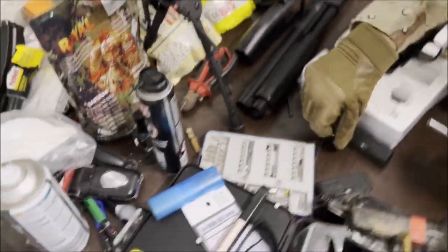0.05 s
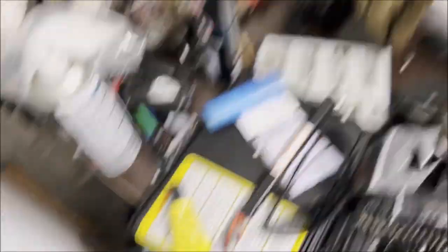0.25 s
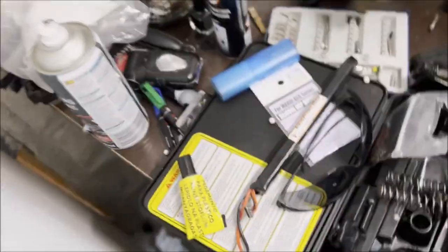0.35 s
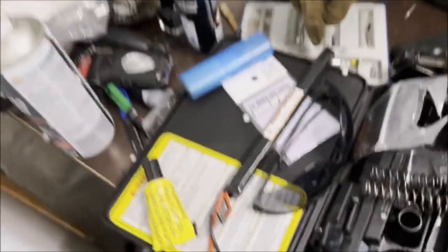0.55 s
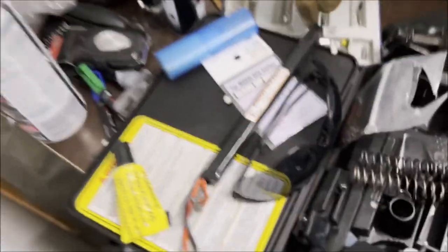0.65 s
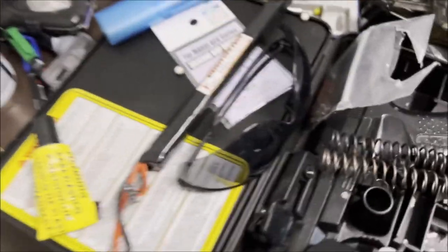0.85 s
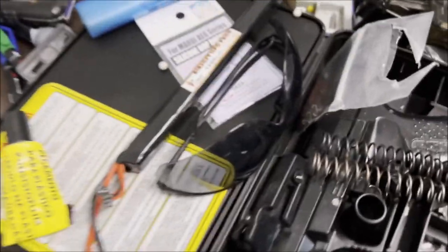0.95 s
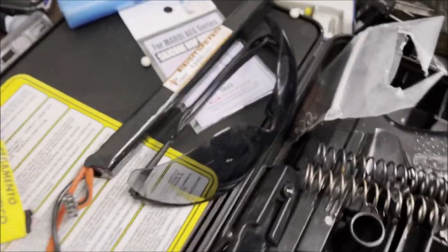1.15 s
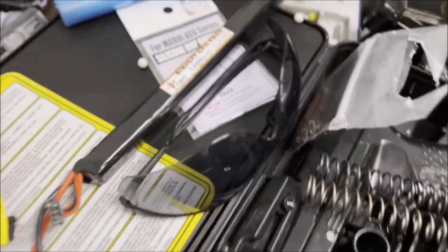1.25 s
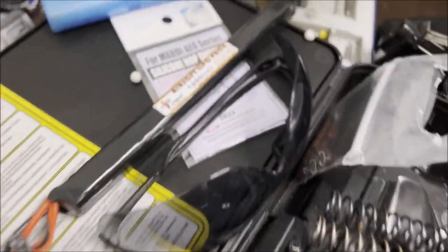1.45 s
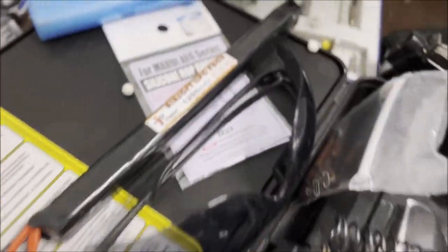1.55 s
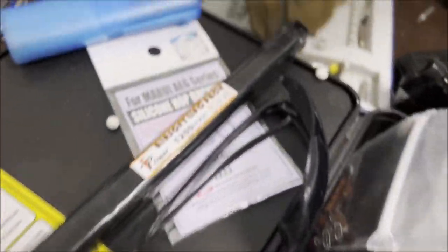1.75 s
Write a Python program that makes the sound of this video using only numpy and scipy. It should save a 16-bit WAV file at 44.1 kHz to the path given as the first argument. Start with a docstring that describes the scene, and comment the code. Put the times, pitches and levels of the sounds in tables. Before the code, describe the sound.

A plastic tray scrapes across a workbench and small metal parts clatter in it.

```python
"""A plastic tray scrapes and squeaks over a cluttered workbench, and small metal parts clatter in it.
They settle, a hard piece clacks down, something knocks the bench top and a few light ticks follow.
Heard from a stereo pair of microphones about an arm's length away, in a small room: the clutter and
the walls scatter the hits, with soft handling noises and a faint rumble and hum underneath."""
import sys
import numpy as np
from scipy import signal
from scipy.fft import rfft, irfft
from scipy.io import wavfile
from scipy.ndimage import uniform_filter1d

SR = 44100
rng = np.random.default_rng(int(sys.argv[2]) if len(sys.argv) > 2 else 0)


def digitize_waveform(pressure):
    """Quantize a signal to 16-bit integers and store it at the path in sys.argv[1].

    Rows of a 2-D input are taken as channels; values are limited to [-1, 1].
    """
    field = np.atleast_2d(pressure).T
    bounded = np.clip(field, -1, 1)
    quanta = np.round(bounded * 32767).astype(np.int16)
    wavfile.write(sys.argv[1], SR, quanta)


N = 79380
TIME_S, FREQ_HZ = np.arange(N) / SR, np.fft.rfftfreq(N, 1 / SR)


def undb(db):
    """Decibels to gain."""
    return 10 ** (np.asarray(db) / 20)


def unit(x):
    """Scale to unit energy."""
    return x / np.sqrt(np.sum(x ** 2, axis=-1, keepdims=True) + 1e-18)


def convolve(x, response):
    """Play sound through a response, channel by channel."""
    return irfft(rfft(x, 2 * N) * rfft(response, 2 * N))[..., :N]


def on_log_axis(points, hz):
    """Read (frequency [Hz], value) points at any frequency."""
    point_hz, value = np.array(points).T
    return np.interp(np.log(hz + 1), np.log(point_hz), value)


def colour(points):
    """Causal unit-energy response with the given spectrum."""
    size = 2048
    gain = undb(on_log_axis(points, np.fft.rfftfreq(size, 1 / SR)))
    cepstrum = irfft(np.log(gain))
    cepstrum[1:size // 2] *= 2  # fold to minimum phase
    cepstrum[size // 2:] = 0
    response = irfft(np.exp(rfft(cepstrum)))
    return np.pad(unit(response), (0, N - size))


def decay(t60):
    """Envelope that falls 60 dB in t60 seconds."""
    return np.exp(-np.log(1000) * TIME_S / t60)


def ring(modes):
    """Unit-energy response of damped modes; a mode's level sets its share of the energy."""
    response = np.zeros(N)
    for hz, db, t60 in modes:
        mode = unit(np.sin(2 * np.pi * hz * TIME_S) * decay(t60))
        response += rng.choice([-1, 1]) * undb(db) * mode
    return unit(response)


def two_mics(x, left_lag_ms):
    """The direct sound reaches the left microphone late by the lag, or early if it is negative."""
    delay_s = np.maximum(np.array([[left_lag_ms], [-left_lag_ms]]), 0) / 1000
    hz = np.fft.rfftfreq(len(x), 1 / SR)
    return irfft(rfft(x) * np.exp(-2j * np.pi * hz * delay_s), len(x))


def grit(count, spread_db):
    """Dense tiny contacts of very unequal size, rms 1."""
    signs = rng.choice([-1, 1], count)
    sizes = undb(spread_db * np.clip(rng.standard_normal(count), -2, 2))
    return unit(signs * sizes) * np.sqrt(count)


def friction(spread_db, left_lag_ms, clutter_db):
    """Steady stick-slip grit at the microphones, part direct and part scattered, rms 1."""
    scattered = np.array([grit(N, spread_db) for _ in range(2)])
    direct = two_mics(grit(N, spread_db), left_lag_ms)
    return unit(direct + undb(clutter_db) * scattered) * np.sqrt(N)


def swells(table):
    """Envelope of pushes that swell and fade."""
    return sum(undb(db) * np.clip(1 - (2 * (TIME_S - start) / length - 1) ** 2, 0, 1) ** 0.48
               for start, length, db in table)


def strikes(table, chatter_s, spread_db, left_lag_ms, clutter_db, clutter_s):
    """Each hit is a brief flurry of contacts with its own hardness and its own echoes off the clutter."""
    size, treble_corner_hz, bass_corner_hz = 4096, 5160, 920
    t, hz = np.arange(size) / SR, np.fft.rfftfreq(size, 1 / SR)
    treble_shelf = hz ** 4 / (hz ** 4 + treble_corner_hz ** 4)
    bass_shelf = 1 / (1 + (hz / bass_corner_hz) ** 4)
    echo_envelope = (1 - np.exp(-t / chatter_s)) * np.exp(-t / clutter_s)
    hits = np.zeros((2, N + size))
    for start, db, treble_db, bass_db in table:
        flurry = unit(grit(size, spread_db) * t * np.exp(-t / chatter_s))
        echoes = unit(rng.standard_normal((2, size)) * echo_envelope)
        hit = two_mics(flurry, left_lag_ms) + undb(clutter_db) * echoes
        gain = undb(db + treble_db * treble_shelf + bass_db * bass_shelf)
        i = int(start * SR)
        hits[:, i:i + size] += irfft(rfft(hit) * gain)
    return hits[:, :N]


# decay of the small room (frequency [Hz], t60 [s])
ROOM_T60 = [(100, .45), (600, .38), (2500, .3), (7000, .26), (15000, .18)]


def in_room(x, pan_db, room_db):
    """Add the room's tail, whose treble dies first, and lean the sound to the left microphone."""
    centres_hz = np.geomspace(100, 16000, 8)
    noise, tail = rfft(rng.standard_normal((2, N))), 0
    for centre, share in zip(centres_hz, np.eye(len(centres_hz))):
        band = irfft(noise * on_log_axis(list(zip(centres_hz, share)), FREQ_HZ), N)
        tail = tail + band * decay(on_log_axis(ROOM_T60, centre))
    build_up = 1 - np.exp(-TIME_S / 0.0027)
    reverb = convolve(x, unit(tail * build_up))
    return (x + undb(room_db) * reverb) * undb(np.array([[pan_db], [-pan_db]]) / 2)


# spectrum of the room tone (frequency [Hz], level [dB])
ROOM_TONE_COLOUR = [(20, -17.5), (35, -18.5), (50, 5.5), (70, -2.5), (120, -8.5), (175, -6.5), (280, -15),
                    (550, -17), (1000, -30.5), (2400, -34), (5000, -42), (8000, -41.5), (10000, -47),
                    (15500, -48.5)]


def room_tone():
    """Low rumble with a faint mains hum; the bass is largely shared by both microphones."""
    rumble_db, hum_db, hum_hz = -65, -74.5, 49.05
    mid, side = rfft(rng.standard_normal((2, N))) * undb(on_log_axis(ROOM_TONE_COLOUR, FREQ_HZ))
    width = on_log_axis([(50, 0.27), (300, .4), (2000, 0.54)], FREQ_HZ)
    left_right = mid + np.array([[1], [-1]]) * width * side
    rumble = unit(irfft(left_right, N)) * np.sqrt(N)
    hum = np.sqrt(2) * np.sin(2 * np.pi * hum_hz * TIME_S)
    return undb(rumble_db) * rumble + undb(hum_db) * hum


# glove and packaging rustles, and low handling thuds (time [s], length [s], level [dB])
RUSTLES = [(.06, 0.11, -61), (.975, 0.054, -50), (1.19, 0.067, -79), (1.36, 0.076, -71.5),
           (1.44, 0.12, -75.5), (1.745, 0.053, -73.5)]
THUDS = [(.225, 0.048, -54), (.36, 0.226, -63.5), (1.05, 0.072, -60), (1.127, 0.022, -55.5),
         (1.155, 0.059, -60.5)]
# their spectra (frequency [Hz], level [dB])
RUSTLE_COLOUR = [(200, -19.5), (1000, -5.5), (2400, 1.5), (4000, -6), (7500, -8.5), (10000, -21),
                 (15500, -25)]
THUD_COLOUR = [(30, -18), (70, -4), (130, 0), (220, -3.5), (450, -9.5), (900, -28.5), (3000, -56)]


def handling():
    """Soft rustles and low thuds as things are moved about near the microphones."""
    rubbing = swells(RUSTLES) * friction(spread_db=11.5, left_lag_ms=0, clutter_db=6)
    bumping = swells(THUDS) * friction(spread_db=9, left_lag_ms=0, clutter_db=-15.5)
    rustle = convolve(rubbing, colour(RUSTLE_COLOUR))
    thud = convolve(bumping, colour(THUD_COLOUR))
    return in_room(rustle + thud, pan_db=2.5, room_db=-6)


# pushes over the bench (time [s], length [s], level [dB])
SCRAPES = [(-.02, 0.11, -60), (.052, .052, -51.5), (.095, 0.039, -55.5), (0.124, .014, -52.5),
           (0.136, 0.2, -55.5), (.65, 0.21, -66), (.772, 0.067, -57.5), (.85, 0.2, -72.5)]
# spectrum of the sliding (frequency [Hz], level [dB])
SLIDE_COLOUR = [(100, -6), (500, 0.5), (1200, 6.5), (2000, 1.5), (3300, 0), (7000, -9), (10000, -25.5),
                (12000, -22.5), (15500, -42)]
# resonances of the sliding tray (frequency [Hz], level [dB], t60 [s])
SLIDE_MODES = [(557, -2.5, 0.017), (820, 1.5, 0.091), (773, -6, 0.027), (1000, -10.5, 0.034),
               (1167, -12.5, 0.15), (1748, -1.5, .04)]
# squeaks of the tray (time [s], length [s], starting pitch [Hz], level [dB])
SQUEAKS = [(.076, .022, 775, -45), (0.098, 0.05, 802, -56.5), (0.778, 0.051, 758, -57)]


def tray_scrapes():
    """Near the centre, plastic sticks and slips over the bench and catches in rough, rising squeaks."""
    ring_db, rise_hz_per_s, roughness = -5, 1000, .025
    body = unit(colour(SLIDE_COLOUR) + undb(ring_db) * ring(SLIDE_MODES))
    rubbing = swells(SCRAPES) * friction(spread_db=6.5, left_lag_ms=.12, clutter_db=4)
    slide = convolve(rubbing, body)
    waver = unit(uniform_filter1d(rng.standard_normal(N), size=120)) * np.sqrt(N)
    for start, length, pitch_hz, db in SQUEAKS:
        hz = (pitch_hz + rise_hz_per_s * (TIME_S - start)) * (1 + roughness * waver)
        slide += swells([(start, length, db)]) * np.sin(2 * np.pi * np.cumsum(hz) / SR)
    return in_room(slide, pan_db=0.9, room_db=-9)


# dull knocks on the bench (time [s], level [dB])
KNOCKS = [(.0535, -8), (.542, -11), (1.1187, 2.5), (1.122, -8), (1.131, -10), (1.4147, -14.5)]
# ringing of the bench top (frequency [Hz], level [dB], t60 [s])
BENCH_MODES = [(312, -13, 0.13), (502, 0, 0.18), (579, 0, 0.031), (741, 5.5, .04), (831, 1, 0.055),
               (1010, -5, 0.022), (1640, -4, 0.036)]


def bench_knocks():
    """Soft blows ring the bench top, to the left of the microphones."""
    gain_db = -17.5
    blows = np.zeros(N)
    for start, db in KNOCKS:
        blows[int(start * SR)] += undb(gain_db + db)
    bench = convolve(blows, ring(BENCH_MODES))
    return in_room(two_mics(bench, left_lag_ms=-0.2), pan_db=6, room_db=-14.5)


# a hard piece set down, then light ticks
# (time [s], level [dB], treble lift [dB], bass lift [dB], relative ring level [dB], ring centre [Hz])
CLACKS = [(0.9558, -20, 5, -10, -20, 1600), (.9588, -12.5, -8, -13, 2.5, 1550),
          (0.9619, -13, 14.5, -0.5, 2.5, 1700), (1.0139, -25, 12, 9.5, -15, 2000),
          (1.0168, -7, 5, -6, -13.5, 2200), (1.024, -8.5, 3, -6.5, -4, 2600),
          (1.0363, -5.5, 12, -22, -18.5, 2800), (1.0396, -1.5, 0.5, -9, 2.5, 2700),
          (1.0455, -13, 10.5, 6, 7.5, 2700), (1.097, -32.5, -15, 12, -7.5, 1900),
          (1.408, -35.5, 10, 0, -16, 2000), (1.418, -28.5, -4, 9, 2, 1900),
          (1.5057, -21.5, -9, -1, -11.5, 2480)]
# spectrum of its contacts (frequency [Hz], level [dB])
PIECE_COLOUR = [(80, -23.5), (300, -5.5), (600, -1), (1100, -1), (1600, 1.5), (2800, 1), (4500, -6),
                (6000, -15), (8300, -11.5), (10200, -29.5), (12000, -20.5), (14000, -37), (15500, -31)]
# its ringing (frequency [Hz], level [dB], t60 [s])
PIECE_MODES = [(1560, 0, .06), (1665, 0, .06), (1960, -5, .05), (2260, -5, .04), (2530, 0, .045),
               (2832, 0, .045), (4452, -6, .035)]


def piece_clacks():
    """A hard piece touches, rocks and lands; where it is struck decides which modes ring most."""
    gain_db, ring_width_octaves, ring_delay_s = -8.5, 0.67, 0.000917
    hits = strikes([row[:4] for row in CLACKS], chatter_s=0.0012, spread_db=4,
                   left_lag_ms=0, clutter_db=1, clutter_s=0.01)
    rings = np.zeros(N)
    for start, db, _, _, ring_db, centre_hz in CLACKS:
        modes = [(hz, mode_db - 6 * abs(np.log2(hz / centre_hz)) / ring_width_octaves, t60)
                 for hz, mode_db, t60 in PIECE_MODES]
        i = int((start + ring_delay_s) * SR)
        rings[i:] += undb(db + ring_db) * ring(modes)[:N - i]
    contacts = in_room(convolve(hits, colour(PIECE_COLOUR)), pan_db=1.5, room_db=-10.5)
    return undb(gain_db) * (contacts + rings)


# parts hitting the tray (time [s], level [dB], treble lift [dB], bass lift [dB])
PART_HITS = [(.2132, -1.5, -4, 0), (.218, -8.5, -5, 6), (.2272, -1, 2.5, -2), (.2372, -2, 2.5, -1.5),
             (.2395, -8.5, 0.5, 1), (.2435, -8.5, 5.5, -8), (.254, -14.5, 8, -4), (.2702, -9, 0.5, 2),
             (.3017, -2, -0.5, 3), (.3075, -11, 0.5, 0), (.3168, -5, 2.5, 1.5), (.3345, -9.5, 2.5, -9),
             (.3405, -8, -3, 0), (.3665, -17.5, 11.5, 8.5), (.3805, -8.5, -9, 7.5), (.3865, -18.5, 1, 13.5),
             (.407, -15, -2, 0), (.4145, -10.5, 1, 2), (.42, -11, 0, 4.5), (.4468, -10, 7, 4),
             (.4525, -14.5, 0.5, -20), (.4735, -11, -6.5, 0.5), (.495, -12.5, -33, 2), (.5185, -19, 0, 8.5)]
# loose parts jostling between the hits (time [s], level [dB])
JOSTLE = [(0.209, -59), (0.214, -38), (.245, -44), (.29, -47.5), (.35, -42), (.40, -46.5), (.43, -42),
          (0.506, -44), (0.546, -65), (.58, -79)]
# spectrum of the struck tray (frequency [Hz], level [dB])
TRAY_COLOUR = [(60, -45.5), (170, -20), (280, -8), (550, -3.5), (850, -6.5), (1200, -1.5), (2400, 3),
               (4000, 2.5), (6300, -3.5), (8500, -4), (10000, -12.5), (12000, -6.5), (13800, -21),
               (15500, -22)]
# ringing of the metal parts (frequency [Hz], level [dB])
PART_MODES = [(1077, -1.5), (1415, -7.5), (1528, -15), (1902, -7), (1943, -2.5), (2195, -3), (2308, -3.5),
              (2340, 1), (2428, -2), (2556, -9.5), (3020, -5.5), (3360, -3.5), (3760, -1.5), (4142, -5.5),
              (4630, -8), (4892, -4), (5646, -6), (6381, 2.5), (7650, -4)]


def parts_rattle():
    """An arm's length away, parts hit the tray and each other, ring faintly and jostle to rest."""
    hit_gain_db, ring_db, ring_t60_s = -3, -12, .17
    hits = strikes(PART_HITS, chatter_s=0.0013, spread_db=7.5,
                   left_lag_ms=.14, clutter_db=2, clutter_s=0.0046)
    times, levels_db = np.array(JOSTLE).T
    jostle_envelope = undb(np.interp(TIME_S, times, levels_db, left=-120, right=-120))
    jostle = jostle_envelope * friction(spread_db=10, left_lag_ms=0.16, clutter_db=2)
    modes = [(hz, db, ring_t60_s) for hz, db in PART_MODES]
    metal = np.array([ring(modes) for _ in range(2)])
    body = colour(TRAY_COLOUR) + undb(ring_db) * metal
    clatter = convolve(undb(hit_gain_db) * hits + jostle, body)
    return in_room(clatter, pan_db=1.5, room_db=-8.5)


def scene():
    """The room and everything on the bench, as the stereo pair hears it."""
    return room_tone() + handling() + tray_scrapes() + bench_knocks() + piece_clacks() + parts_rattle()


def record(dry):
    """The recorder cuts the top steeply."""
    top_hz = 16000
    return signal.sosfilt(signal.ellip(8, .2, 70, top_hz, fs=SR, output="sos"), dry)


dry = scene()
out = record(dry)
digitize_waveform(out)
```